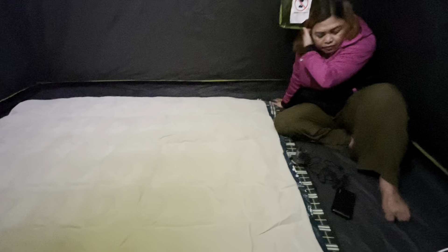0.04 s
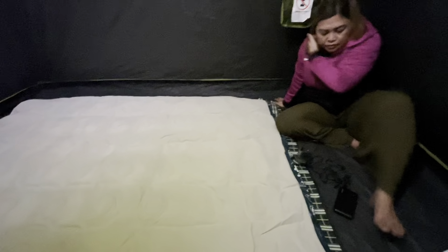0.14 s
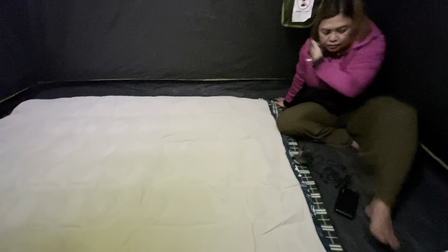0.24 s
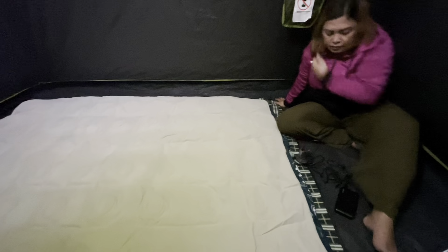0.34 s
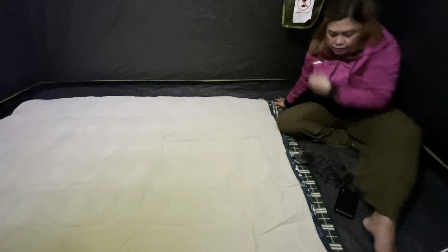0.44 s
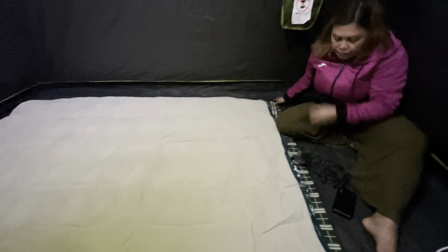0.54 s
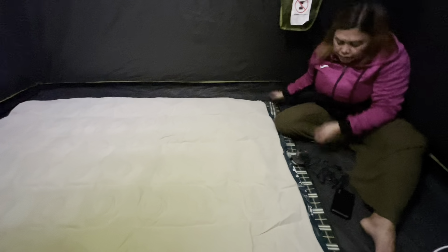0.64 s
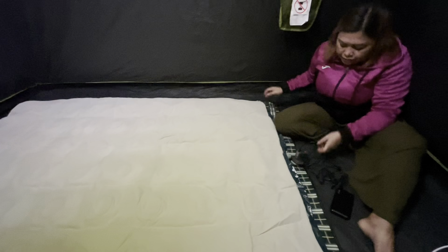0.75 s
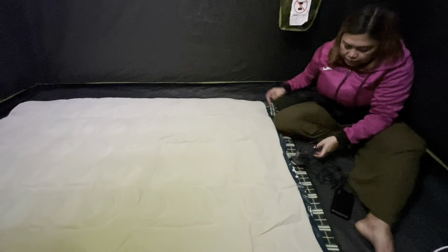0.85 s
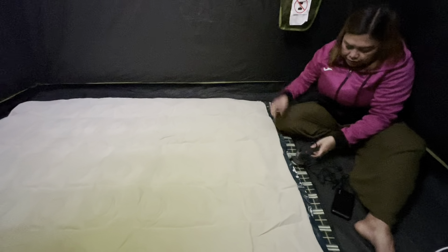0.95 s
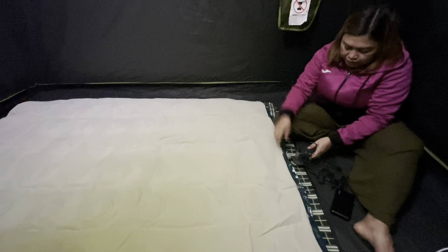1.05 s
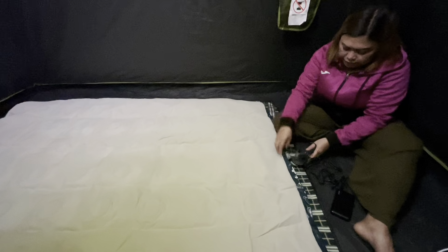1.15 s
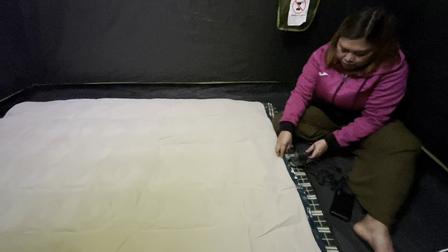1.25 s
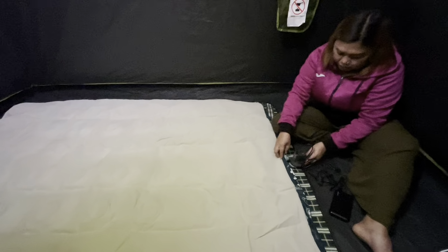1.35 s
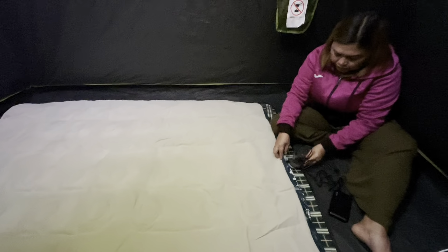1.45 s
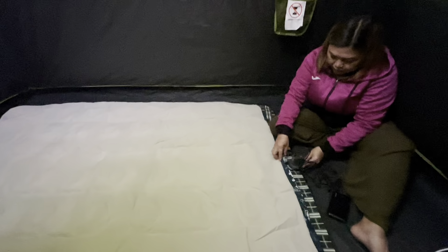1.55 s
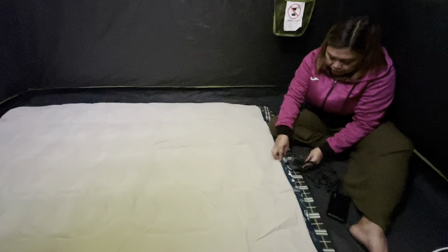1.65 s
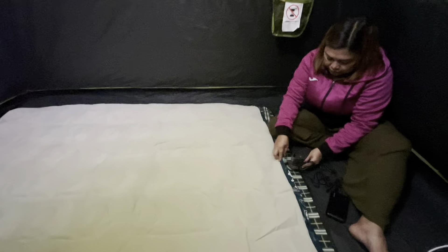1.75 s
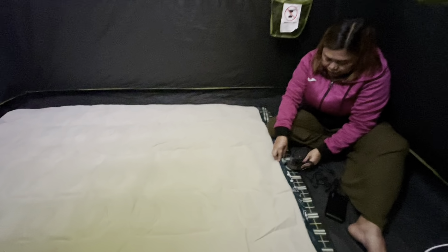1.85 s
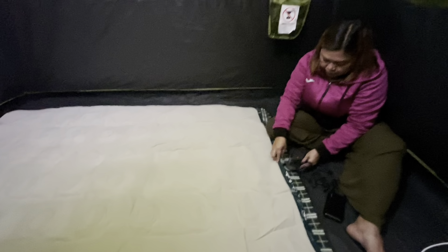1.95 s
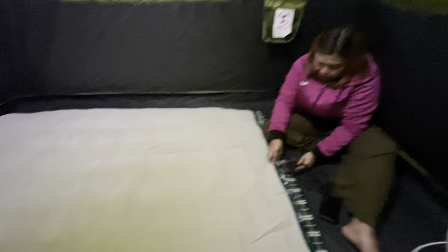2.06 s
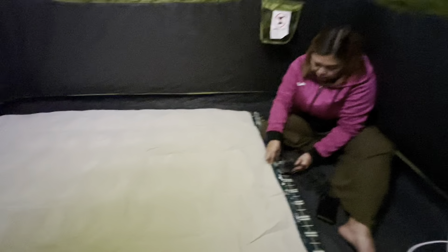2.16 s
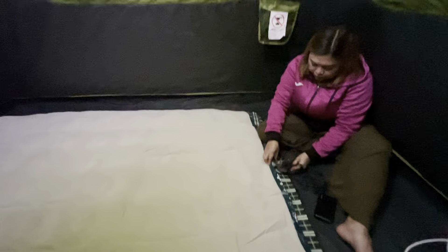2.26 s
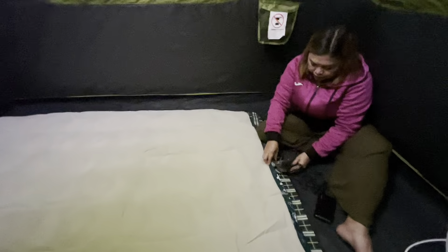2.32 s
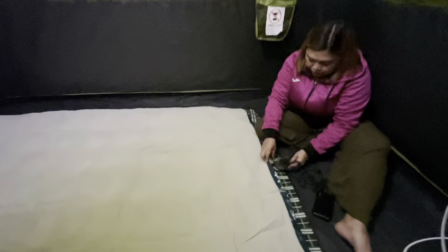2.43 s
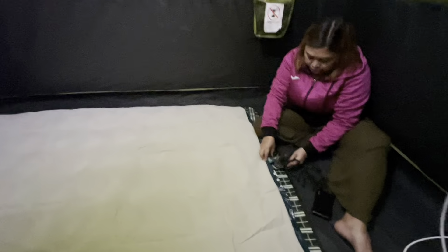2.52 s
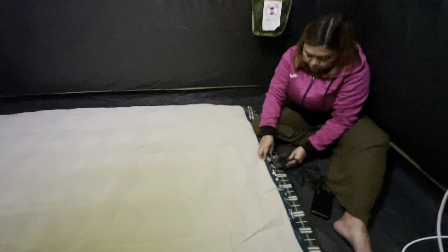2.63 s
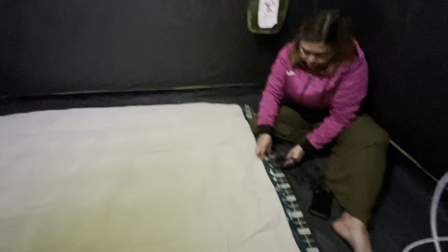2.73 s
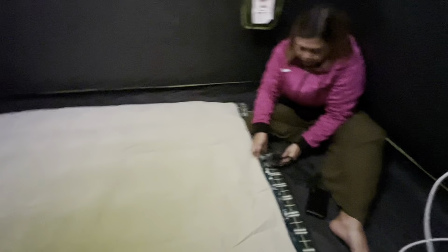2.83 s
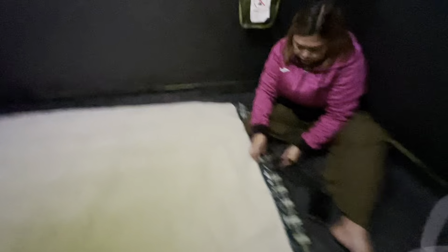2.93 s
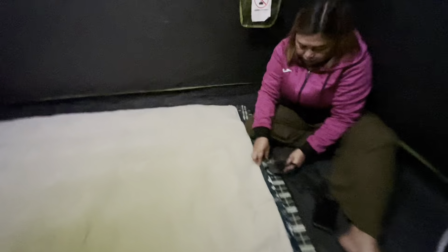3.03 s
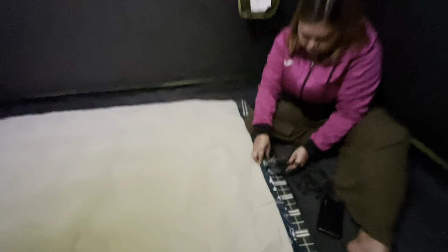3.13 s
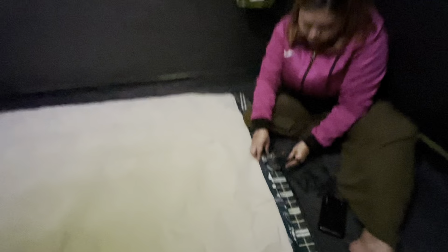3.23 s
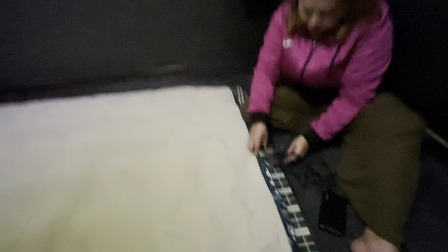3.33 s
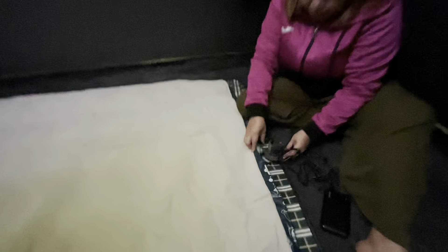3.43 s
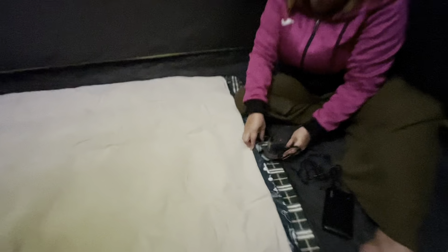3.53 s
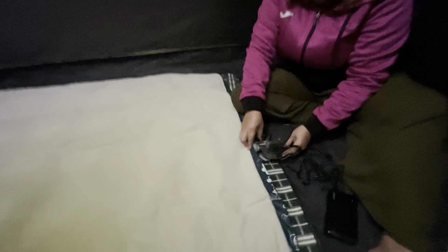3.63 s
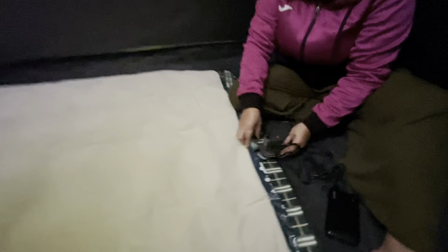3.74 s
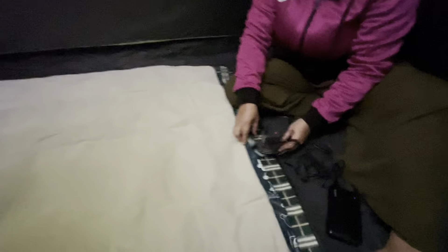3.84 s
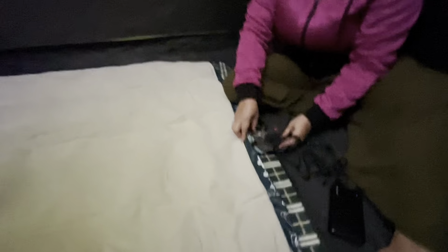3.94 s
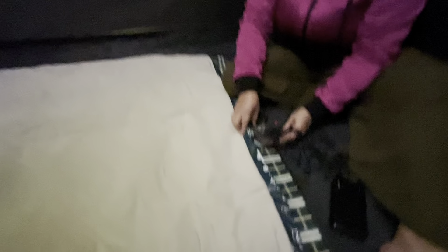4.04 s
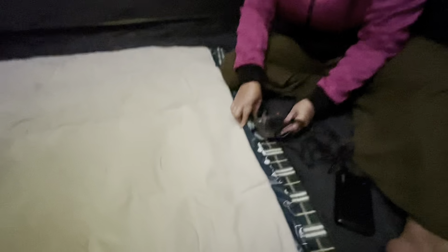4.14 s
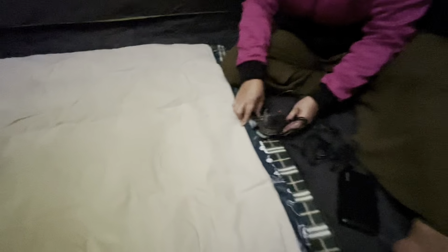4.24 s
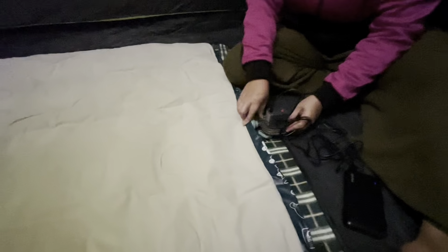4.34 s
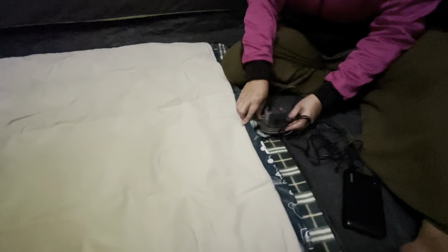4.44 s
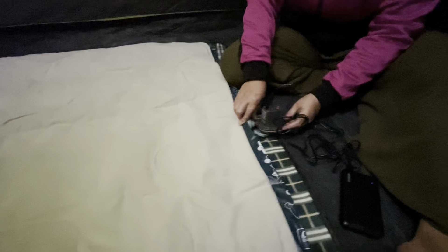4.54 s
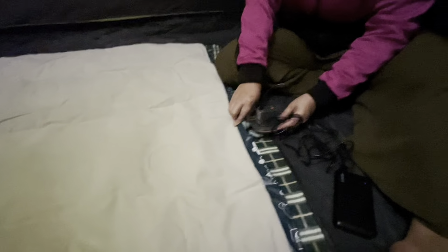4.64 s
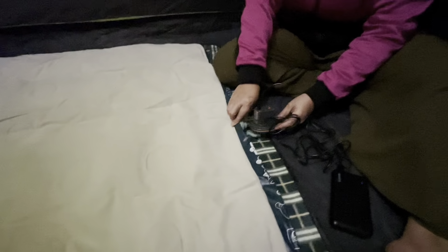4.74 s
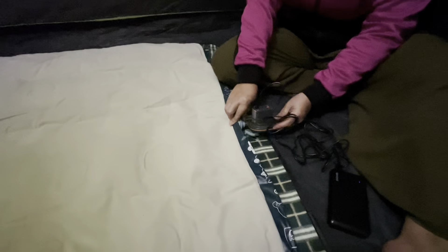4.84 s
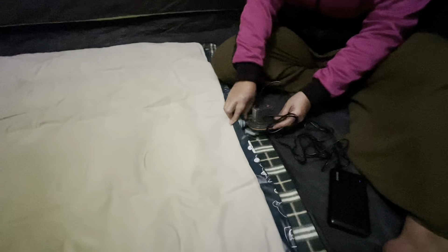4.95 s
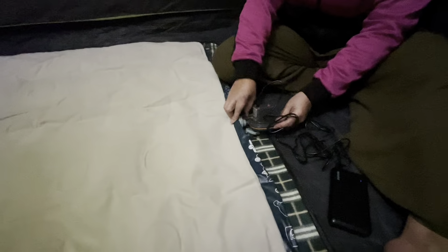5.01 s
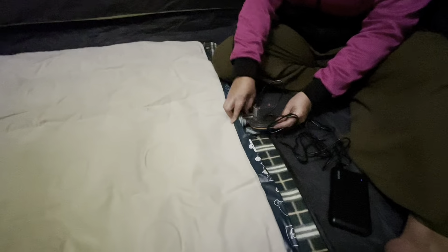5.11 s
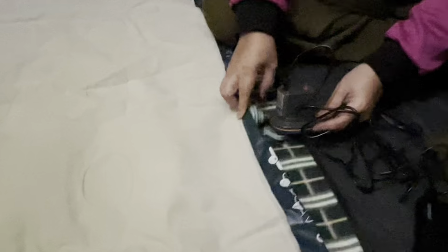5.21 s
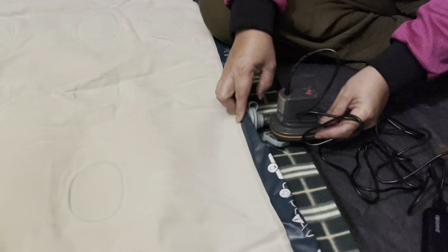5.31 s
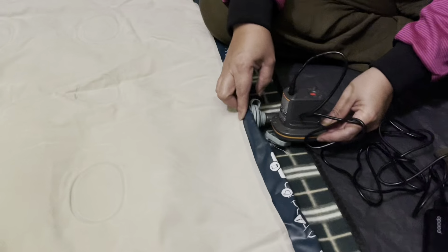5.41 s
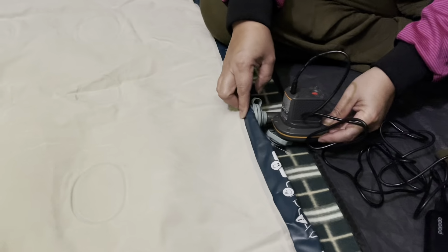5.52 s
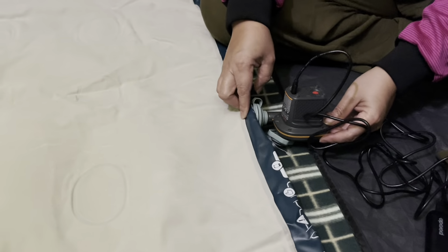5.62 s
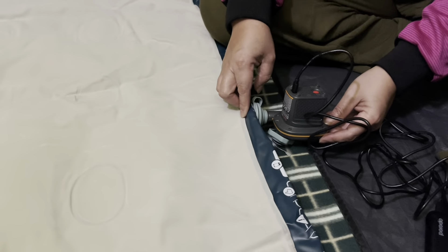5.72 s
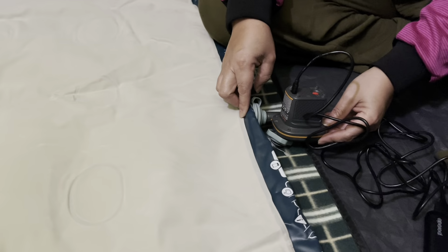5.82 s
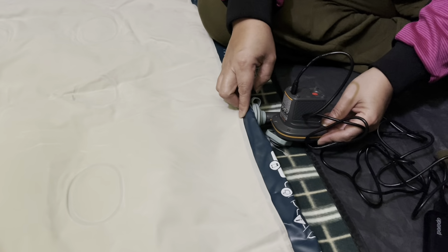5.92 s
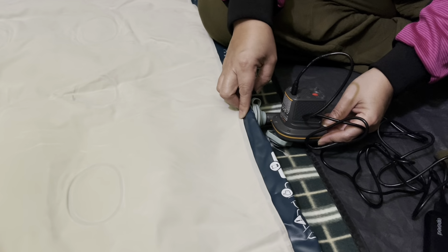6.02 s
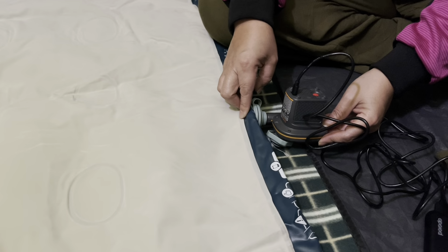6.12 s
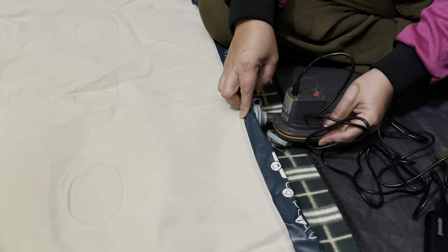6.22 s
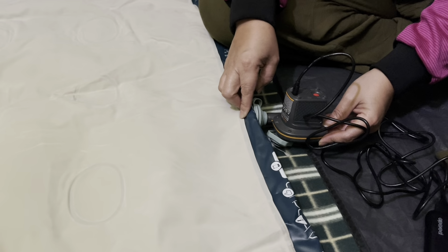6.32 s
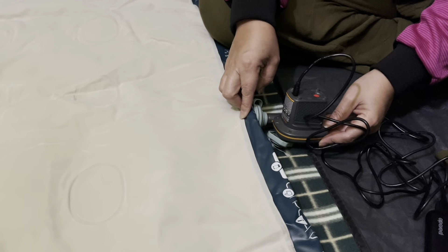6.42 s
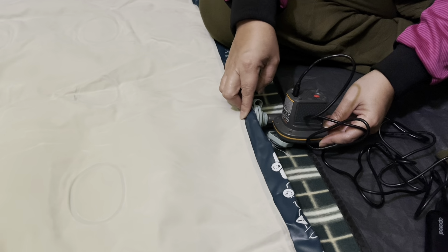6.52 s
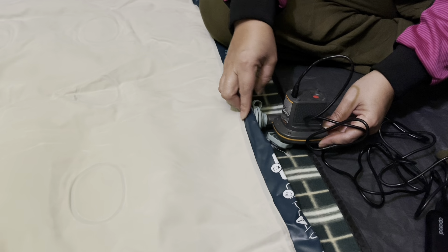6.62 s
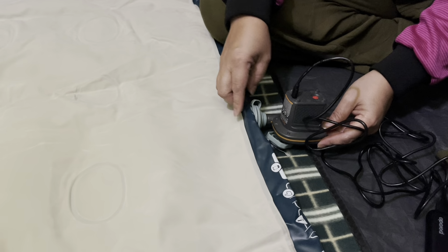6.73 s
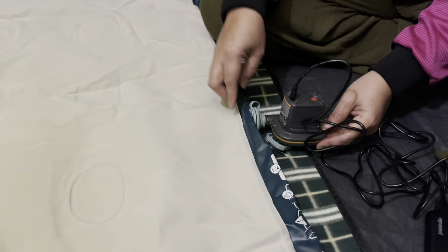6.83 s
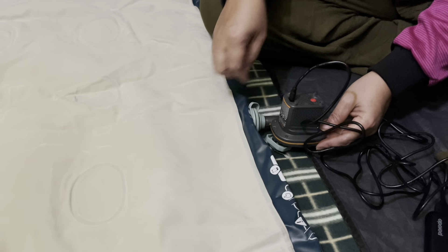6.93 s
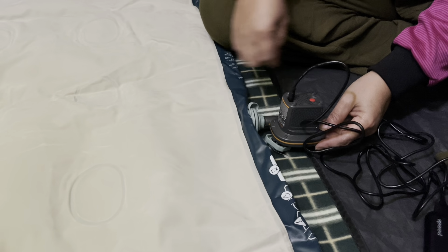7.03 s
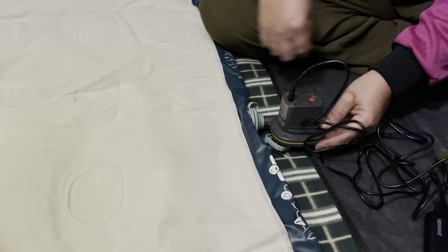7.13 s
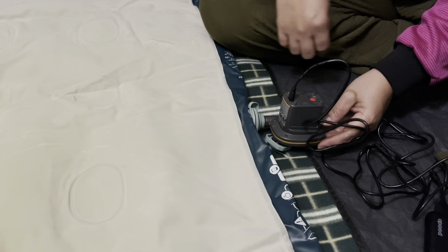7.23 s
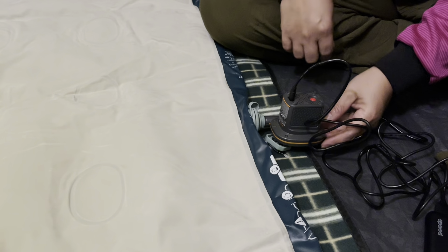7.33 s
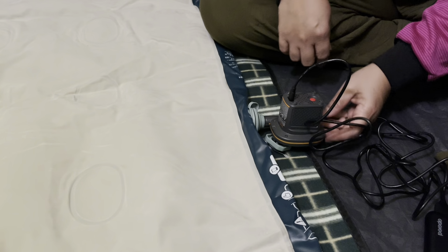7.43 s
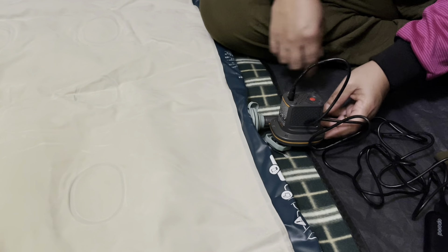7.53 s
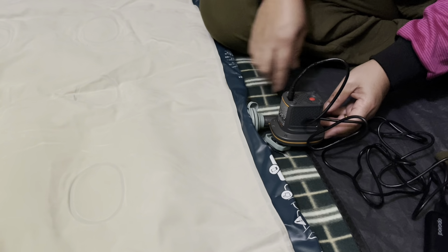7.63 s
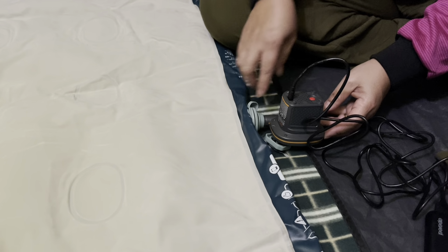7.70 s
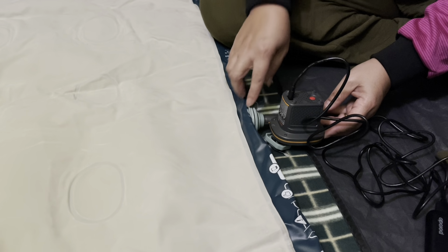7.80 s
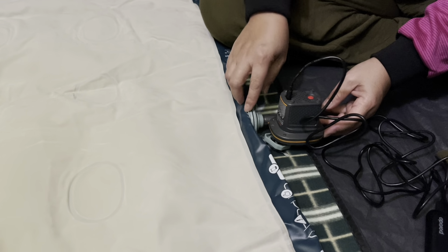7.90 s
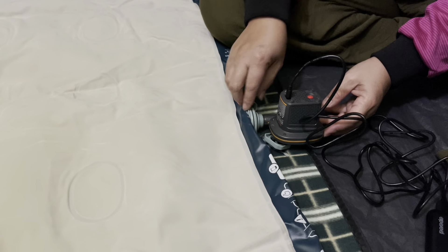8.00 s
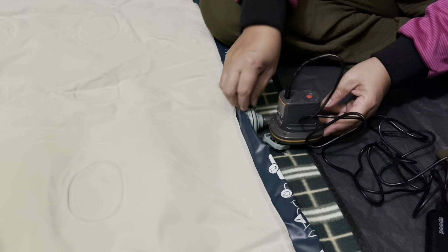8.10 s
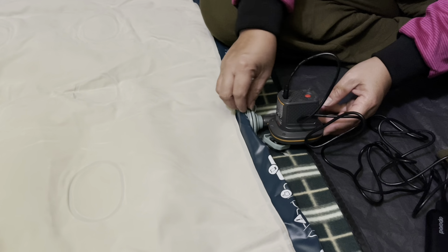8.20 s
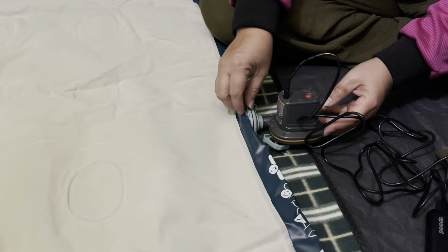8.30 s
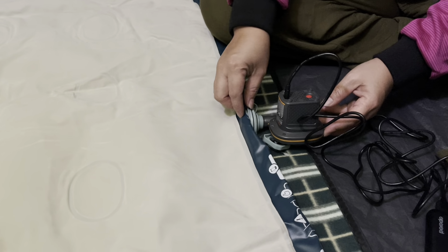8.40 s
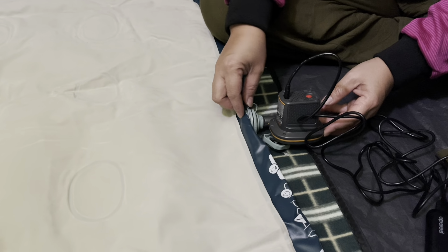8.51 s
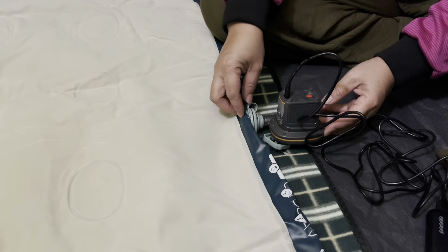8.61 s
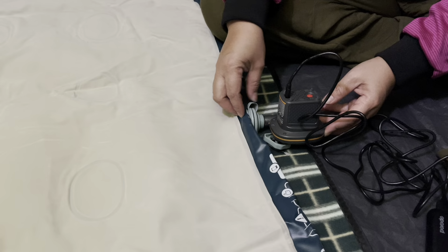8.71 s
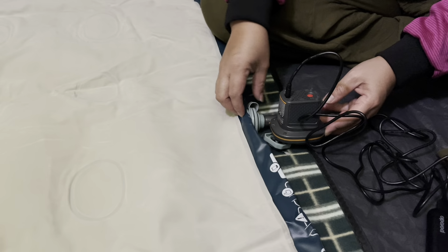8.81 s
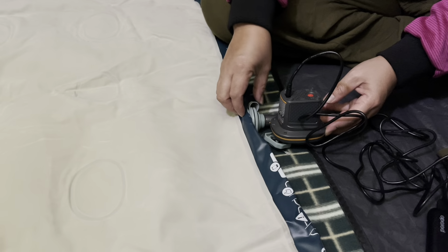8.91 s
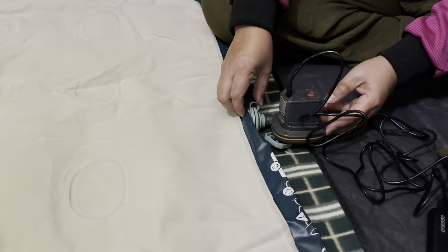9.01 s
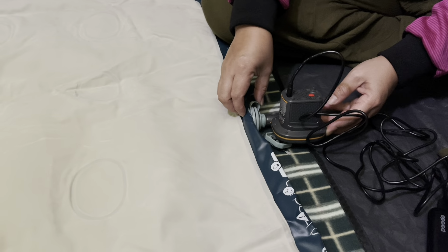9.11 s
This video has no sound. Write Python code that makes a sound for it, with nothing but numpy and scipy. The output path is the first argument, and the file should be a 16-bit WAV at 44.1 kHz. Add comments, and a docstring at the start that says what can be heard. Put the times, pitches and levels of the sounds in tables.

```python
"""A small electric pump fills an air mattress in a tent: an eight-blade impeller whines over rushing air,
and sags for a moment under load. Its tones are sines locked to one shaft; the air is coloured noise.
The microphone moves in close through the tent's echoes, with a few soft bumps of handling.
Cloth swishes at first, as smooth noise. A low drone of wavering sines, like a distant generator, lies underneath."""
import sys
import numpy as np
from scipy import signal
from scipy.fft import rfft, irfft, next_fast_len
from scipy.io import wavfile
from scipy.ndimage import map_coordinates

SR = 44100
rng = np.random.default_rng(int(sys.argv[2]) if len(sys.argv) > 2 else 0)


def digitize_waveform(pressure):
    """Quantize a signal to 16-bit integers and store it at the path in sys.argv[1].

    Rows of a 2-D input are taken as channels; values are limited to [-1, 1].
    """
    field = np.atleast_2d(pressure).T
    bounded = np.clip(field, -1, 1)
    quanta = np.round(bounded * 32767).astype(np.int16)
    wavfile.write(sys.argv[1], SR, quanta)


N = 403956

# How the microphone moves. Each row: time in seconds, closeness from 0 (far) to 1 (near),
# speed in metres per second, change of the motor buzz in dB.
MICROPHONE = [(0, 0, 0.081, 0), (2.3, 0, 0.055, -1.5), (2.8, 0.24, 0.3, -0.5), (4.2, 0.47, 0.26, 3),
              (5.2, 0.78, 0.19, 1.5), (5.7, 0.84, 0.049, 2), (7.2, 1, 0.018, 2.5), (9.16, 1, 0.019, -0.5)]
# How fast the motor turns. Each row: time in seconds, turns of the shaft per second (Hz).
SHAFT_SPEED = [(0.0, 299.3), (1.38, 298.2), (2.22, 302.9), (3.77, 303.7), (4.46, 302.3), (5.13, 282.8),
               (5.36, 286.5), (5.51, 284.4), (5.89, 266.9), (6.43, 273.2), (7.02, 290.1), (7.22, 293.2),
               (7.53, 296.0), (9.16, 299.5)]
# How far each pitch leans to one side. Each row: frequency in Hz, left minus right in dB.
LEFT_LEAN = [(100, 1), (640, 6), (2100, 2), (6800, 2.5), (10000, 0)]


def amp(db):
    """Turn decibels into a plain gain."""
    return 10 ** (np.asarray(db) / 20)


def unit(x):
    """Scale a sound to an rms (average strength) of 1."""
    return x / np.sqrt(np.mean(x ** 2) + 1e-20)


def along(points, hz):
    """Read a curve of (Hz, value) points, with straight lines on a log frequency axis."""
    point_hz, values = np.transpose(points)
    return np.interp(np.log(hz + 1), np.log(point_hz), values)


def curves(rows):
    """Draw each column after the time as a curve with one value per sample."""
    times, *columns = np.transpose(rows)
    return [np.interp(np.arange(N) / SR, times, column) for column in columns]


def wobble(rate):
    """A smooth random curve through `rate` random points a second."""
    coarse = np.arange(0, N + 32, 32)  # work out every 32nd sample, then join them up
    knots = rng.standard_normal(4096)
    smooth = map_coordinates(knots, [coarse * rate / SR], mode="wrap")
    return np.interp(np.arange(N), coarse, smooth)


def sides(lean_db):
    """Left and right gains for a level difference in dB."""
    return amp(np.array([lean_db, -lean_db]).reshape(2, -1) / 2)


def noise(spectrum):
    """Stereo noise with a given colour; the average of left and right has a strength of 1."""
    # How alike left and right are. Each row: frequency in Hz, likeness (1 same, -1 opposite; clipped there).
    alike = [(300, 0.93), (700, 0.69), (1500, 0.44), (7000, 0.55), (8600, 1), (9500, -0.72), (10200, -1.1),
             (11000, -0.38), (12100, 0.99)]
    size = next_fast_len(N + 8192)
    hz = np.fft.rfftfreq(size, 1 / SR)
    turn = np.arccos(np.clip(along(alike, hz), -1, 1)) / 2
    white = rfft(rng.standard_normal((2, size)))
    mid, side = white * amp(along(spectrum, hz)) * [np.cos(turn), np.sin(turn)]
    left_right = np.array([mid + side, mid - side]) * sides(along(LEFT_LEAN, hz))
    pair = irfft(left_right, size)[:, :N]
    return pair / pair.mean(0).std()


def closeness():
    """How near the microphone is to the pump, 0-1."""
    return np.clip(curves(MICROPHONE)[0], 0, 1)


def level(law, bend=1, cruise_hz=299):
    """A layer's dB from closeness and shaft speed; with bend under 1 it rises early in the approach."""
    far_db, near_db, db_per_hz = law
    sag_hz = cruise_hz - curves(SHAFT_SPEED)[0]
    return far_db + (near_db - far_db) * closeness() ** abs(bend) - db_per_hz * sag_hz


def resonances(table, hz):
    """Gain in dB of a set of peaks and notches."""
    return sum(db / (1 + (2 * (hz - centre) / width) ** 2) for centre, width, db in table)


def tent(x, still, moving, count=5):
    """Wall echoes whose paths change as the microphone moves, so that every line fades at its own times."""
    speed = np.abs(curves(MICROPHONE)[1])
    travel = np.cumsum(speed) / SR  # metres moved so far
    n = np.arange(N)
    echoes = np.zeros((2, N))
    for ear in range(2):
        for heading in np.linspace(-1, 1, count):
            metres = rng.uniform(1, 4) + (heading + .3) * travel
            delay = metres / 343 * SR  # sound covers 343 metres a second
            echoes[ear] += np.interp(n - delay, n, x[ear])
    share = still + moving * speed  # echoes are stronger during movement
    return (x + share * echoes / np.sqrt(count)) / np.sqrt(1 + share ** 2)


def partial(angle, order, db, flutter_db=1.5, lead=0.9, spread=1.0):
    """One tone at `order` cycles a turn, at both microphone ports; short waves reach them out of step."""
    hz = order * angle[-1] / (2 * np.pi) * SR / N  # average pitch
    skew = (lead + spread * rng.standard_normal()) * min(hz / 2400, 1)  # radians between the ports
    phase = order * angle + rng.uniform(0, 2 * np.pi) + np.array([[skew], [-skew]]) / 2
    gain = np.sqrt(2) * amp(db + flutter_db * wobble(45))
    return gain * sides(along(LEFT_LEAN, hz)) * np.sin(phase)


def blade_tone(angle, lead=0.95, flutter_db=0.75, gain_db=0.86):
    """Eight blades pass the outlet each turn; the tone reaches the left port first."""
    # The tone swells and fades among the tent's standing waves.
    # Each row: time in seconds, level in dB before gain_db is added.
    swell = [(0.0, -38.5), (1.4, -37), (2.22, -45.5), (2.5, -36.5), (2.76, -50.5), (3.03, -39.5),
             (3.44, -47.5), (3.52, -39), (3.85, -51), (4.03, -35.5), (4.36, -42), (4.62, -33),
             (4.82, -46.5), (4.9, -38.5), (5.76, -31.5), (5.87, -39), (6.45, -31.5), (7.22, -37.5),
             (7.91, -33.5), (9.16, -34.5)]
    # Its balance between the ports. Each row: time in seconds, left minus right in dB.
    balance = [(0.0, 12.5), (0.64, -4.5), (0.81, 7), (1.35, -3.5), (4.06, 5.5), (4.36, -7), (4.59, 7),
               (5.07, -11), (5.51, -1.5), (9.16, 13)]
    passing = 8 * angle + np.array([[lead], [-lead]]) / 2  # lead is in radians
    ports = sides(curves(balance)[0])
    gain = np.sqrt(2) * amp(curves(swell)[0] + gain_db + flutter_db * wobble(30))
    return gain * ports / ports.mean(0) * np.sin(passing)


def impeller(angle, third_db=-9, whistle_lead=-2.43, hum_drift_db=1.5):
    """The blade tone and its overtones; unbalance adds a hum and two sidebands."""
    # Sidebands of the blade tone, from rotor unbalance.
    # Each row: cycles per turn, dB from afar, dB close by; the chamber below adds to both.
    sideband_rows = [(7, -59, -47), (9, -56, -45.5)]
    # Peaks and a notch of the impeller chamber, which the sidebands slide through.
    # Each row: centre in Hz, width in Hz, gain in dB.
    chamber = [(2011, 95, 9.5), (2547, 200, -16), (2750, 120, 8.5)]
    # How loud each tone is. Each holds: dB from afar, dB close by, dB lost per Hz that the shaft slows.
    hum_law = (-49.5, -45, 0.19)
    octave_law = (-48, -41, 0.0089)
    whistle_law = (-56.5, -41.5, 0.48)

    shaft_hz = curves(SHAFT_SPEED)[0]
    sidebands = np.zeros((2, N))
    for order, far_db, near_db in sideband_rows:
        db = level((far_db, near_db, 0), bend=0.26) + resonances(chamber, order * shaft_hz)
        sidebands += partial(angle, order, db)
    octave = partial(angle, order=16, db=level(octave_law, bend=0.28))
    # the top whistle beams forward: it is loudest close by and at full speed
    whistle_db = level(whistle_law, bend=4)
    whistle = partial(angle, order=32, db=whistle_db, lead=whistle_lead, spread=0.22)
    third = partial(angle, order=24, db=whistle_db + third_db)
    hum_db = level(hum_law) + hum_drift_db * wobble(3.09)
    hum = partial(angle, order=1, db=hum_db, flutter_db=0.74)
    overtones = tent(octave + third + whistle + sidebands, still=0.26, moving=1.44)
    return hum + tent(blade_tone(angle), still=0.12, moving=0.97) + overtones


def motor(angle, free_hz=294, stalled_hz=270, buzz_db=-1.0):
    """The commutator buzzes on many multiples of the shaft speed; the shell colours it, load shifts its balance."""
    # The buzz, before the gains added below. Each row: cycles per turn, dB from afar, dB close by,
    # dB under load.
    commutator = [(2, -68, -58, -67.5), (3, -56, -55.5, -55.5), (4, -60.5, -58, -58),
                  (5, -50.5, -51.5, -56), (6, -52.5, -52, -46.5), (10, -51, -50.5, -56.5),
                  (11, -54, -52.5, -53), (12, -48.5, -49.5, -51), (13, -55.5, -54.5, -46.5),
                  (14, -58, -57, -54.5), (15, -52.5, -48, -47.5), (17, -53.5, -50.5, -68),
                  (18, -49.5, -47, -56.5), (19, -54.5, -61.5, -45), (20, -51.5, -61, -74),
                  (21, -51.5, -53.5, -59.5), (23, -54, -57, -63), (24, -48, -55, -58), (27, -78, -62, -72),
                  (28, -82, -53.5, -68), (29, -70, -69, -75), (30, -77, -62, -53.5), (31, -71, -75, -60),
                  (36, -56.5, -60.5, -84), (37, -66, -50, -75), (38, -70, -59, -86), (39, -70, -63, -58)]
    # Shell resonances that the tones slide through. Each row: centre in Hz, width in Hz, gain in dB.
    housing = [(2885, 270, 6), (3766, 350, 8.5), (5177, 200, 7.5)]
    shaft_hz = curves(SHAFT_SPEED)[0]
    close, gain_db = closeness(), curves(MICROPHONE)[2]
    load = np.clip((free_hz - shaft_hz) / (free_hz - stalled_hz), 0, 1)  # 0 free, 1 fully loaded
    buzz = np.zeros((2, N))
    for order, far_db, near_db, labour_db in commutator:
        free_db = far_db + close * (near_db - far_db)
        load_db = load * (labour_db - free_db)
        # the shell's gain changes slowly, so every 16th sample is enough
        shell_db = np.repeat(resonances(housing, order * shaft_hz[::16]), 16)[:N]
        buzz += partial(angle, order, gain_db + free_db + load_db + shell_db)
    return amp(buzz_db) * tent(buzz, still=0.44, moving=4.3)


def airflow(angle, chop=0.12, churn_db=1.24, leak_db=-1.8, sputter_db=1.4):
    """Turbulence in the mattress, the impeller and the nozzle; the upper part pulses once a turn."""
    # Colours of the moving air, from low to high. Each row: frequency in Hz, relative level in dB.
    boom_colour = [(140, -17.5), (200, -12.5), (245, 2.5), (275, -6), (330, -29), (430, -33.5)]
    rush_far = [(150, -8), (440, -6), (540, -17.5), (650, -5), (930, 5.5), (1110, -5), (1270, 1), (1650, 4),
                (1850, -3), (2500, -4.5), (3500, -23)]
    rush_near = [(150, -7.5), (380, -9), (600, -7.5), (850, 2.5), (1080, -18), (1260, 0.5), (1680, 3),
                 (1930, -8), (2200, -2), (2500, -10), (3500, -63)]
    spray_colour = [(1800, -40), (2800, -5.5), (3300, -5), (3950, 0), (4500, -7), (5550, -7), (6100, -13.5),
                    (7200, -8.5), (8200, -10.5), (10000, -40)]
    hiss_colour = [(6000, -15.5), (7800, -11.5), (8700, -0.5), (9500, 7.5), (10200, -3), (11300, 5),
                   (12000, -4), (12900, -45)]
    # How loud each layer is. Each holds: dB from afar, dB close by, dB lost per Hz that the shaft slows.
    boom_law = (-52, -48, 0.68)
    rush_law = (-46, -43, 0.085)
    spray_law = (-50, -46, .02)
    # Hiss that leaks round the nozzle. Each row: time in seconds, level in dB before leak_db is added.
    leak = [(0.5, -48.5), (0.91, -46.5), (1.94, -54.5), (5.22, -47), (5.73, -43), (6.29, -49), (6.84, -40),
            (7.2, -41.5), (7.95, -39.5), (8.36, -44.5), (8.8, -41), (9.16, -46)]

    close = closeness()
    pulse = 1 + np.clip(chop, 0, 1) * np.cos(angle)
    boom = amp(level(boom_law)) * noise(boom_colour)
    # a floor reflection hollows the rush at a pitch that depends on distance
    rush_noise = np.sqrt(1 - close) * noise(rush_far) + np.sqrt(close) * noise(rush_near)
    rush = amp(level(rush_law, bend=1.8) + churn_db * wobble(14)) * rush_noise
    spray = amp(level(spray_law, bend=0.6)) * noise(spray_colour)
    hiss = amp(curves(leak)[0] + leak_db + sputter_db * wobble(11)) * noise(hiss_colour)
    return boom + rush + tent(pulse * spray, still=0.27, moving=0.37) + pulse * hiss


def cloth(peak_db=-33.0, attack_s=0.065, hold_s=0.12, release_s=0.26, flutter_db=0.2):
    """A brief, smooth swish of fabric sliding on the groundsheet."""
    # Colour of the swish. Each row: frequency in Hz, relative level in dB.
    fabric = [(1200, -11), (5600, 4.5), (8000, 3.5), (11300, 13.5), (12900, -5)]
    hold_end = attack_s + hold_s
    stroke, = curves([(0, .4), (attack_s, 1), (hold_end, .75), (hold_end + release_s, 0)])
    return stroke * amp(peak_db + flutter_db * wobble(90)) * noise(fabric)


def generator(firing_hz=25.57, hunt=0.024, rumble_db=-55):
    """A slow engine far off: only a few low multiples of its firing rate arrive, over a dull rumble."""
    # The drone's tones. Each row: multiple of the firing rate, level in dB around which it wavers.
    drone_rows = [(2, -50.5), (3, -57.5), (4, -73), (5, -67)]
    # Colour of the rumble. Each row: frequency in Hz, relative level in dB.
    rumble_colour = [(22, -30), (50, -2), (80, -1), (120, -1.5), (170, -14), (260, -9), (500, -39)]
    # the firing rate wanders a little
    angle = 2 * np.pi * np.cumsum(firing_hz * (1 + hunt * wobble(7))) / SR
    drone = np.zeros(N)
    for order, db in drone_rows:
        tone = np.sin(order * angle + rng.uniform(0, 2 * np.pi))
        drone += amp(db + 2.7 * wobble(7.0)) * tone
    return np.sqrt(2) * drone * sides(2.9) + amp(rumble_db) * noise(rumble_colour)


def handling(attack=0.00067, scuff=0.58):
    """Each bump rings one damped mode under a short scuff of noise."""
    # Soft bumps of handling. Each row: start in seconds, level in dB, pitch in Hz,
    # seconds to die away by 60 dB.
    bumps = [(2.084, -38, 275, 0.088), (2.76, -40.5, 296, 0.4), (2.87, -42, 269, 0.23),
             (6.605, -31, 1160, 0.031)]
    out, t = np.zeros(N), np.arange(SR // 2) / SR
    for start, db, hz, t60 in bumps:
        band = signal.butter(2, [hz / 2, hz * 1.4], "band", fs=SR, output="sos")
        rub = unit(signal.sosfilt(band, rng.standard_normal(len(t))))
        ring = np.sin(2 * np.pi * hz * t) + scuff * rub
        envelope = amp(db - 60 * t / t60) * (1 - np.exp(-t / attack))  # attack is in seconds
        out[round(start * SR):][:len(t)] += envelope * ring
    return out


def scene(jitter=0.00047):
    """One slightly unsteady shaft drives both the whine and the air."""
    shaft_hz = curves(SHAFT_SPEED)[0] * (1 + jitter * wobble(70))
    angle = 2 * np.pi * np.cumsum(shaft_hz) / SR
    return impeller(angle) + motor(angle) + airflow(angle) + cloth() + generator() + handling()


def record(dry, low_cut_hz=39, top_hz=12920):
    """The microphone sheds the deepest bass and keeps nothing above its band limit."""
    size = next_fast_len(N + 8192)
    hz = np.fft.rfftfreq(size, 1 / SR)
    bass = (hz / low_cut_hz) ** 4
    response = bass / np.hypot(1, bass) * (hz < top_hz)
    return irfft(rfft(dry, size) * response, size)[:, :N]


dry = scene()
out = record(dry)
digitize_waveform(out)
```